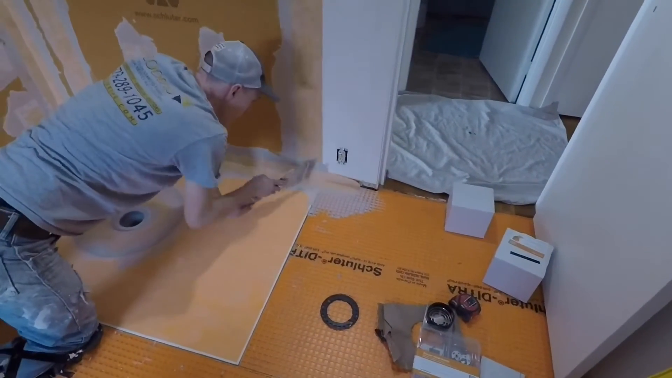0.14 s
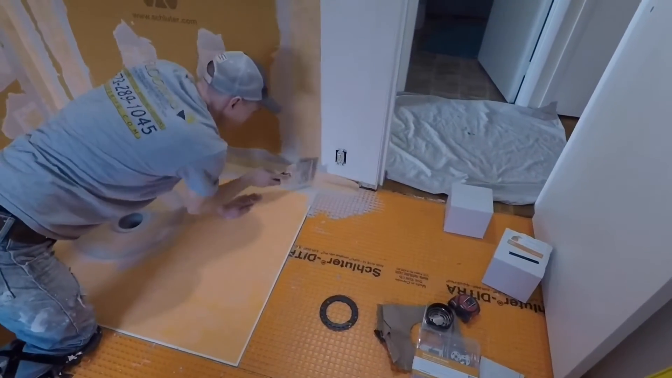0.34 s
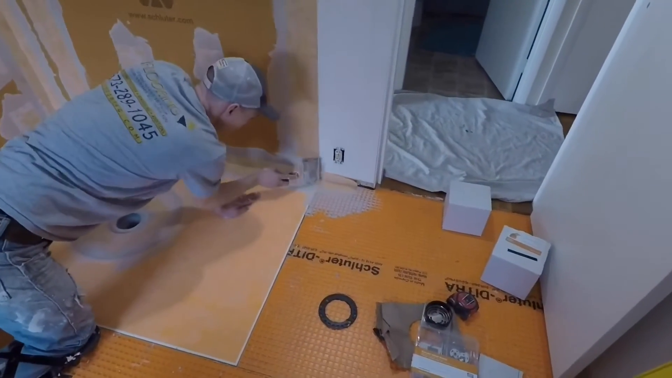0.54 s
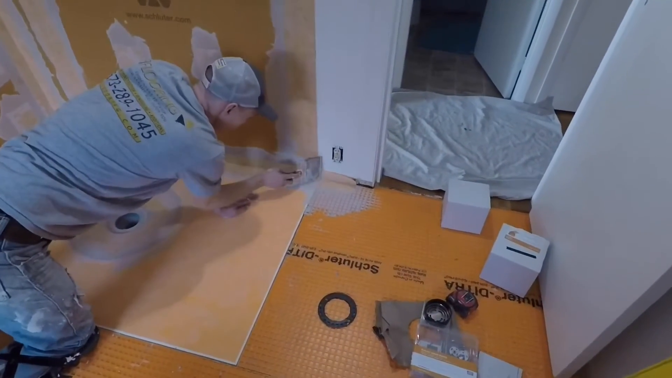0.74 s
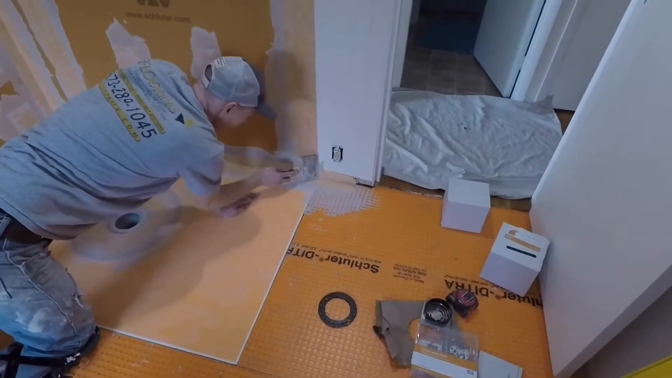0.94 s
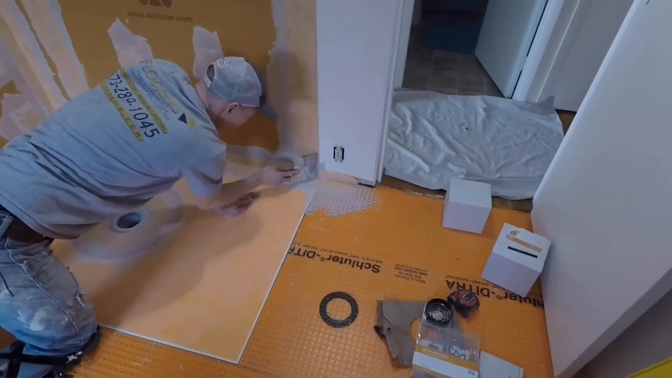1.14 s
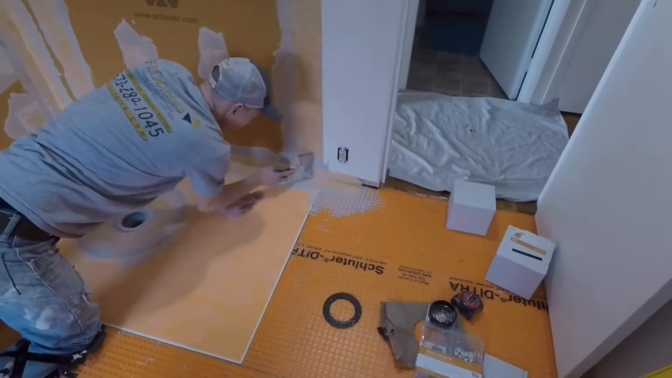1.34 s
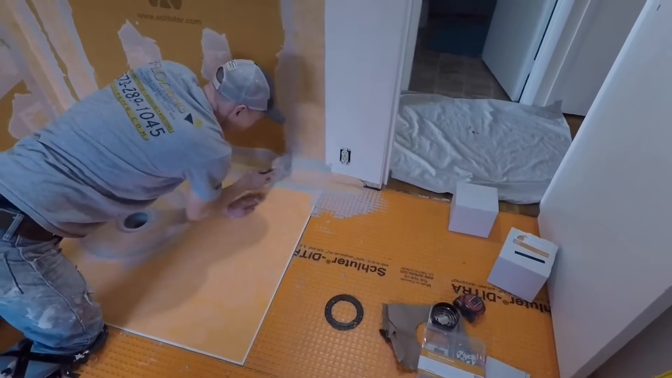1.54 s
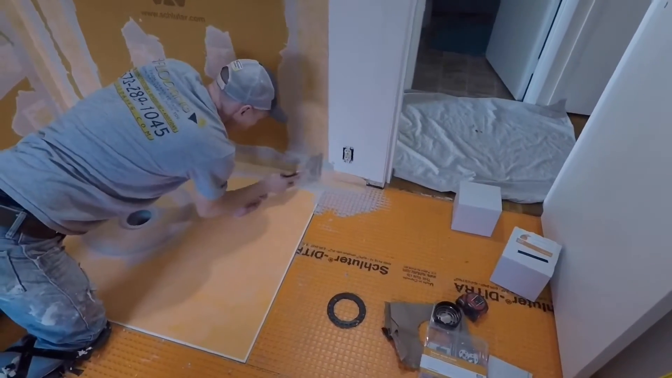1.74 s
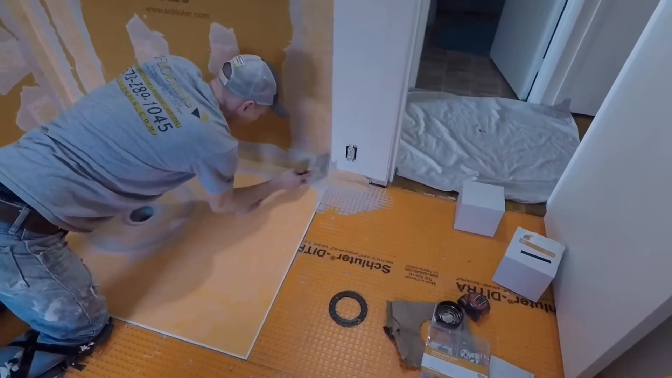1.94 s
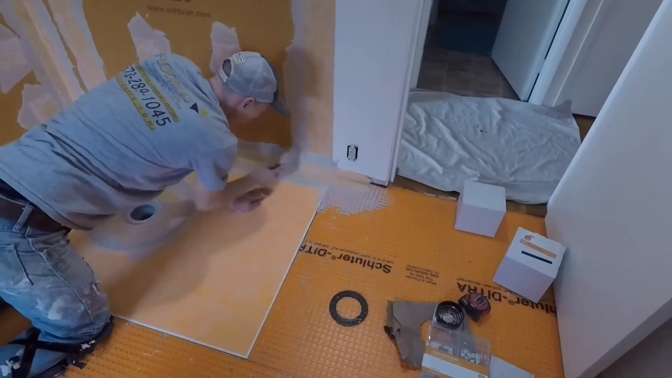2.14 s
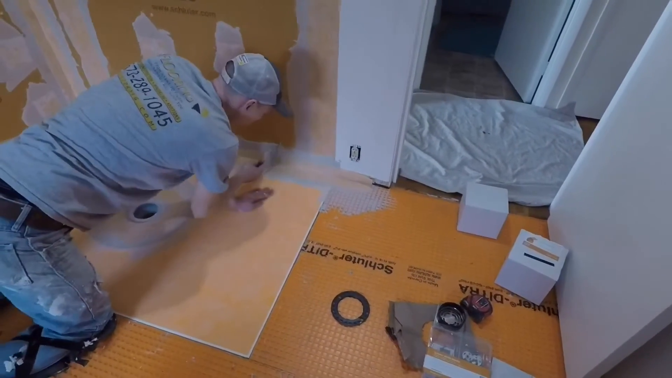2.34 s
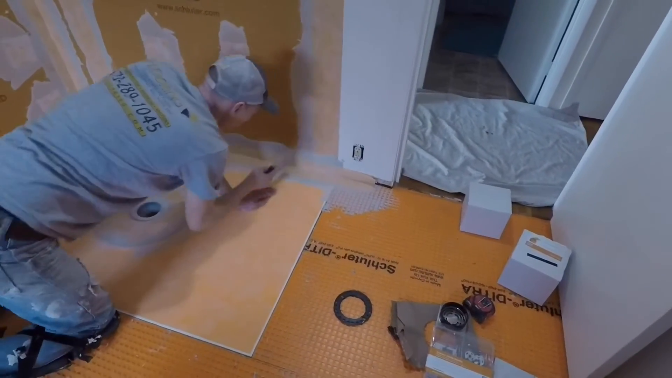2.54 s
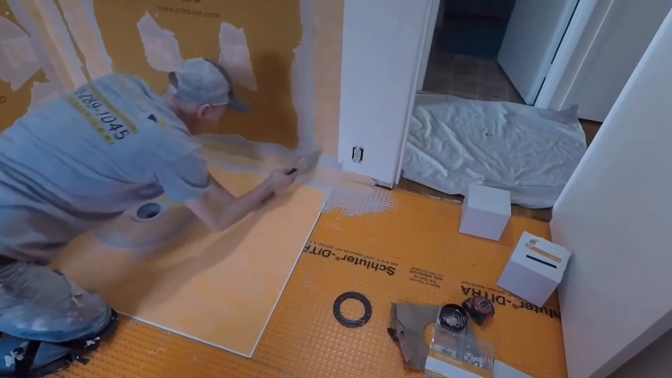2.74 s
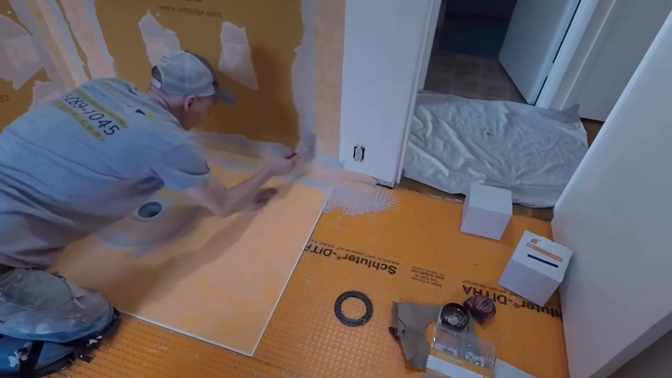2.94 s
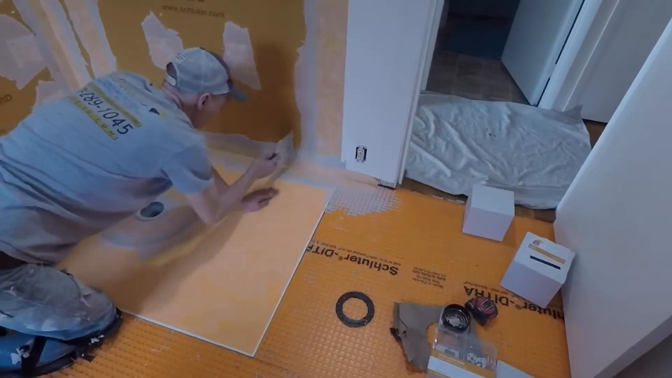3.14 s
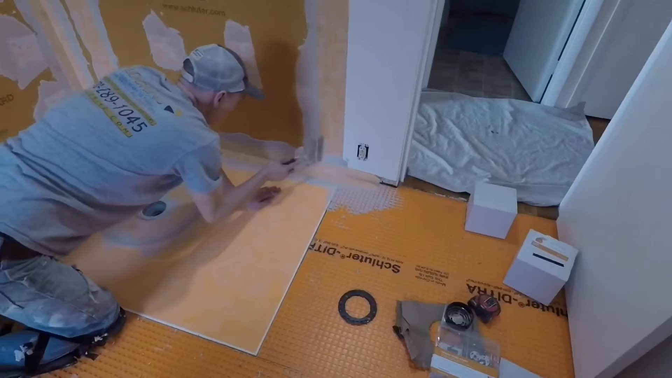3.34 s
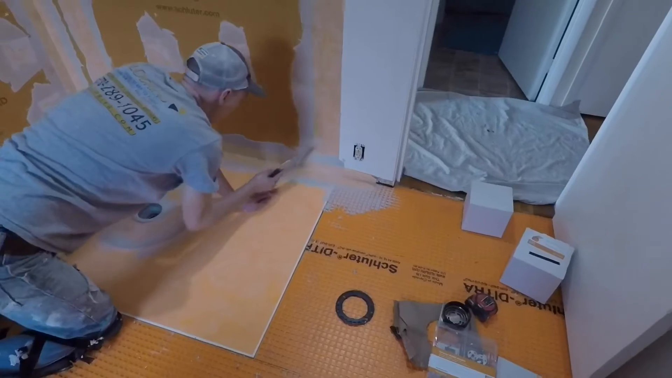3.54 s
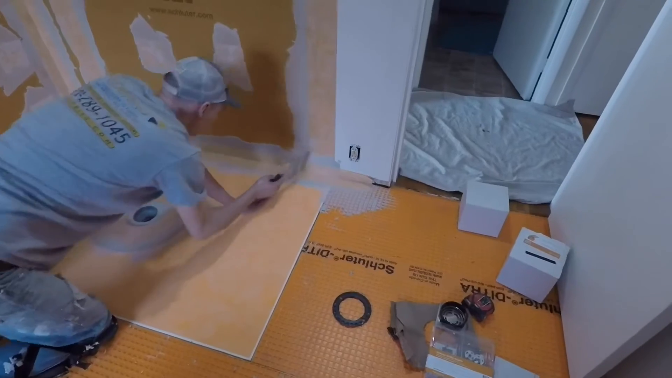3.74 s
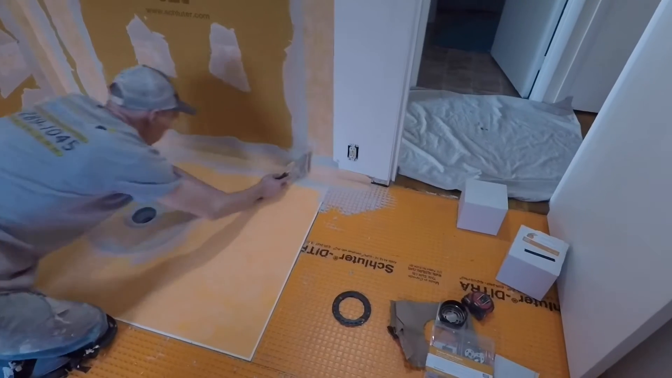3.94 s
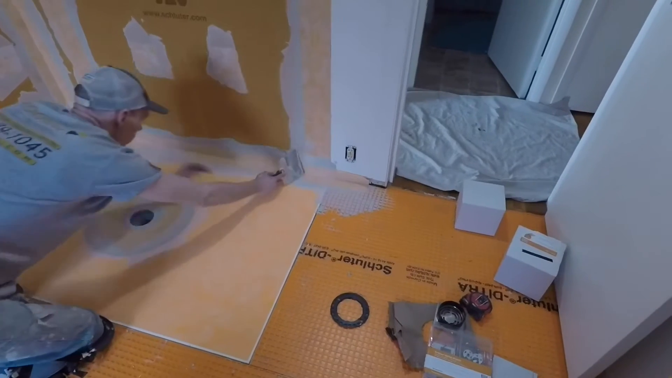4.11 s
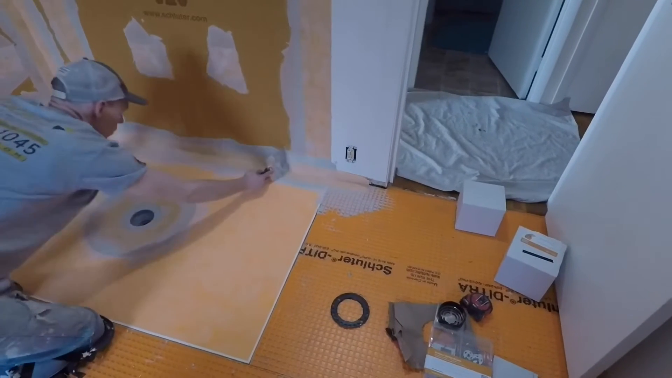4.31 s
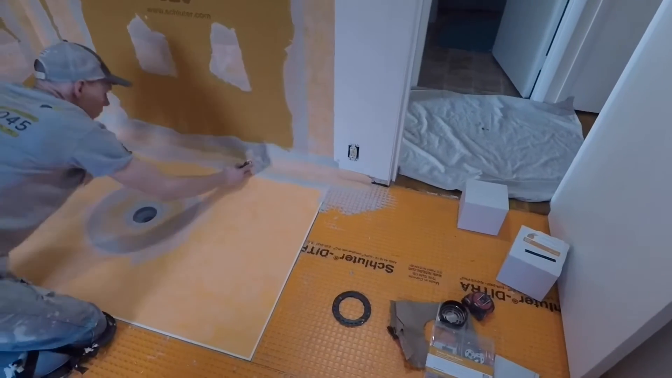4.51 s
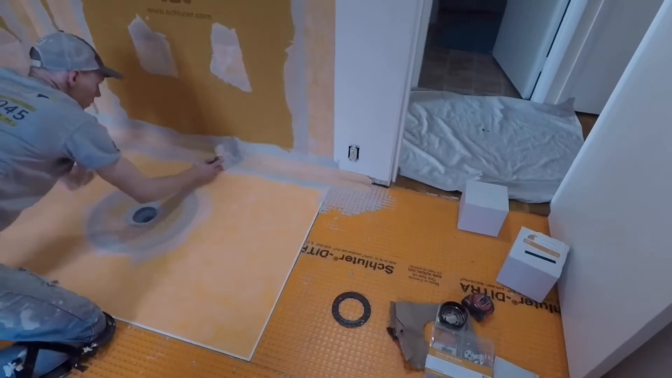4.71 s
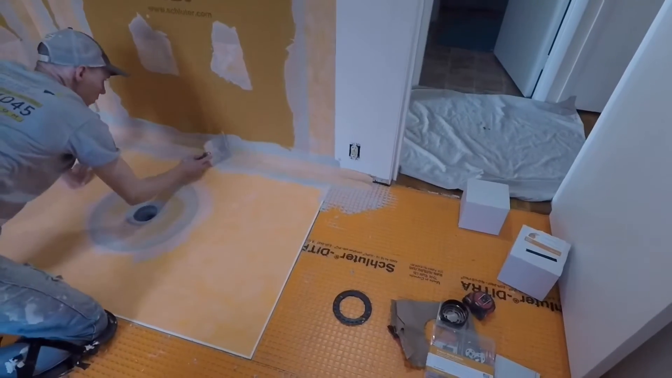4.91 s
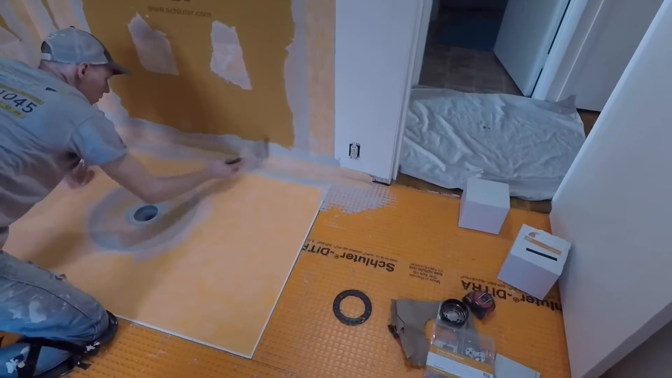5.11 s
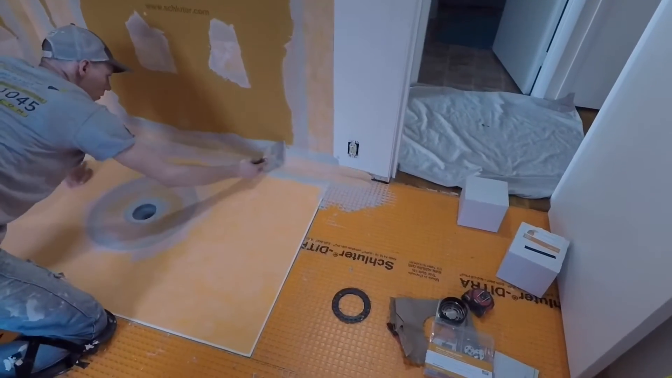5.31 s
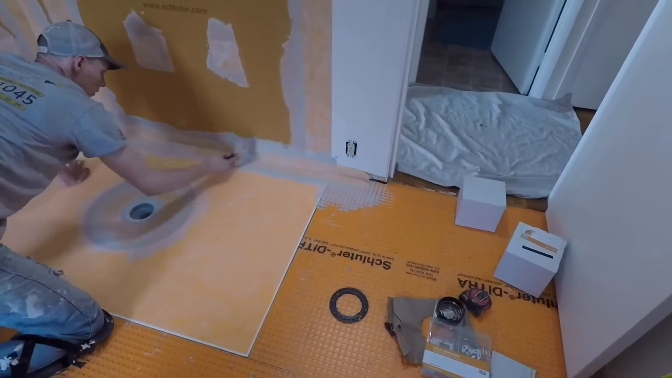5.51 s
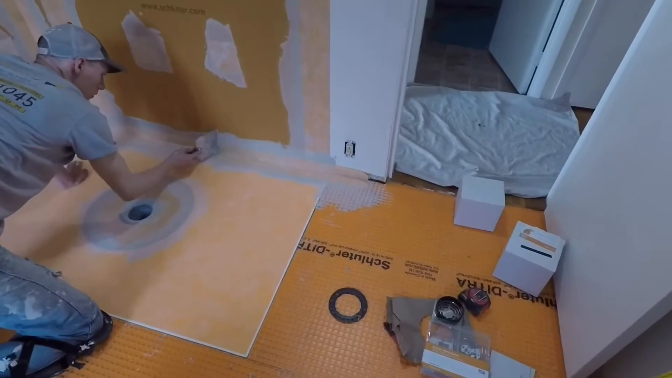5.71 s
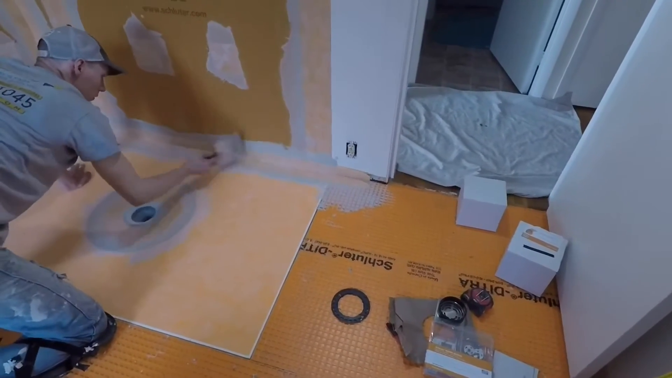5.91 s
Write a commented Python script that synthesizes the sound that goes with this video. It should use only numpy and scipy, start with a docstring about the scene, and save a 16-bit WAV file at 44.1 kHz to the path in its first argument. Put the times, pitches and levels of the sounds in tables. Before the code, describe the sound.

A low ventilation rumble with a thin hiss of air runs throughout in a small bare room. At about 0.5 seconds a steel trowel bumps down with a dull thud and a light tick, then softly brushes the foot of a wall around 1 second. From 1.2 seconds it drags gritty mortar in five strokes, each lasting half a second to a second: a sandy rasp with a thin, high ring from the edge and a hollow rattle from the wall board. The first is the quietest. The others start near 1.9, 2.8, 4.2 and 5.3 seconds, the fourth being the longest. Soft thuds of the tool landing come at 1.9 seconds, in a quick knocking cluster from 4.1 to 4.3, and again at 5.2. Faint grazes fall between strokes. The last scrape fades by 5.9 seconds. The sound is stereo, with brief reverberation and lower tones leaning left.

```python
"""A ventilation rumble fills a small bare room. A steel trowel bumps down with a tick and brushes
the foot of a wall. From 1.2 s it drags gritty mortar along it in five strokes, about one a second:
sand grains rasp under the edge, bend the blade and shake the wall board. The tool bumps down again
before the second, fourth and fifth strokes. Two microphone ports mix it all into stereo."""
import sys
import numpy as np
from scipy import signal
from scipy.fft import rfft, irfft, next_fast_len
from scipy.io import wavfile
from scipy.ndimage import uniform_filter1d, map_coordinates

SR = 44100
rng = np.random.default_rng(int(sys.argv[2]) if len(sys.argv) > 2 else 0)


def dump(signal):
    """Clip the signal to [-1, 1] and save it as 16-bit WAV at the path in sys.argv[1]."""
    limited = np.clip(np.atleast_2d(signal).T, -1, 1)
    pcm = np.round(limited * 32767).astype(np.int16)
    wavfile.write(sys.argv[1], SR, pcm)


N = 262880


def amp(db):
    return 10 ** (np.asarray(db) / 20)


def unit(x):
    return x / np.sqrt(np.mean(x ** 2) + 1e-20)


def along(points, hz):
    """Read the columns after the frequency at hz, on a log axis."""
    f, *cols = np.transpose(points)
    return np.squeeze([np.interp(np.log(hz + 1), np.log(f + 1), c) for c in cols])


def automation(rows):
    """One value per sample for each column after the time."""
    s, *cols = np.transpose(rows)
    return [np.interp(np.arange(N) / SR, s, c) for c in cols]


def filtered(x, response):
    """Pass x through a complex frequency response."""
    m = next_fast_len(N + SR // 2)
    return irfft(rfft(x, m) * response(np.fft.rfftfreq(m, 1 / SR)), m)[..., :N]


def resonances(modes, f):
    """Response at f of (frequency, width, level) modes of alternating polarity."""
    return sum((-1) ** k * amp(db) * 1j * f * width / (hz * hz - f * f + 1j * f * width)
               for k, (hz, width, db) in enumerate(modes))


def wobble(per_s):
    """A smooth random curve, per_s knots a second."""
    return map_coordinates(rng.standard_normal(int(N * per_s / SR) + 4), [np.arange(N) * per_s / SR])


def grit(spread_db, clump_s):
    """Sand grains of log-normal size arriving in clumps; two unrelated streams."""
    clumps = unit(uniform_filter1d(rng.standard_normal((2, N)), max(1, int(clump_s * SR))))
    return unit(rng.standard_normal((2, N)) * amp(spread_db * clumps))


def swept_peak(x, centre_hz, lift_db, width, frame, patchy_db):
    """Sweep an EQ peak over x at steady loudness; width is a fraction of the centre."""
    hz, t, spectrum = signal.stft(x, SR, nperseg=frame)
    centre, lift = (np.interp(t, np.arange(N) / SR, c) for c in (centre_hz, lift_db))
    gain = 1 + (amp(lift) - 1) / (1 + (np.log((hz[:, None] + 1) / centre) / width) ** 2)
    # uneven mortar excites some frequencies more than others from moment to moment
    patches = uniform_filter1d(rng.standard_normal(spectrum.shape[1:]), size=3, axis=0)
    patches = uniform_filter1d(patches, size=6, axis=1)
    spectrum = spectrum * amp(patchy_db * unit(patches))
    power = np.mean(np.abs(spectrum) ** 2, axis=(0, 2))[:, None]
    gain = gain * np.sqrt(power.sum() / (power * gain ** 2).sum(axis=0))
    rms = np.sqrt(2 * power.sum() / 1.5)  # 1.5 is the window's noise bandwidth
    return signal.istft(spectrum * gain, SR, nperseg=frame)[1][:, :N] / rms


# Low room modes (frequency [Hz], width [Hz], level [dB])
ROOM_MODES = [(60.7, 4, 2), (91.5, 14.6, -1.5), (108.8, 44, -6), (144.6, 22.6, -1.5)]
# Tone of the air hiss (frequency [Hz], level [dB])
AIR_EQ = [(170, -1), (200, -4.5), (300, -13.5), (500, -20.5), (1000, -29.5), (2600, -38), (3500, -40.5),
          (5000, -45), (5700, -38.5), (6300, -39), (7000, -42.5), (10400, -44.5), (11500, -50),
          (15000, -63)]
# Fader rides on the bed (time [s], rumble level [dB], deep bass level [dB])
VENT_LEVELS = [(0.05, -22.5, -21.5), (0.34, -23.5, -45), (0.42, -22, -28), (2.13, -25.5, -42),
               (2.51, -26.5, -30), (2.95, -21.5, -30), (3.21, -27.5, -45), (4.12, -23, -28),
               (4.15, -21.5, -32), (5.0, -25.5, -25.5), (5.05, -28, -33), (5.21, -20.5, -27),
               (5.65, -27.5, -46), (5.9, -29, -39)]


def ventilation():
    """Duct noise rings the room's low modes under a thin hiss of air; a deeper bass wavers below."""
    noise = lambda response: unit(filtered(rng.standard_normal((2, N)), response))
    rumble = noise(lambda f: resonances(ROOM_MODES, f) / (1 + (f / 165) ** 8) / (1 + (48 / (f + 1)) ** 4))
    deep = noise(lambda f: resonances([(28, 26, 0)], f) / (1 + (f / 48) ** 4))
    air = noise(lambda f: amp(along([(120, -56)] + AIR_EQ, f)))
    deep = unit(deep * amp(4 * wobble(per_s=6)))
    rumble_db, deep_db = automation(VENT_LEVELS)
    return amp(rumble_db) * rumble + amp(deep_db) * deep + amp(-40.5) * air


# Reverb tail of the bare room (frequency [Hz], time to fall 60 dB [s])
ROOM_DECAY = [(200, 0.14), (1000, 0.63), (6000, 0.44), (12000, 0.16)]


def room(x):
    """Each frequency of the reverberation dies at its own speed."""
    hz, t, spectrum = signal.stft(rng.standard_normal((2, SR * 3 // 4)), SR, nperseg=256)
    decay = amp(-60 * t / along(ROOM_DECAY, hz)[:, None])
    tail = signal.istft(spectrum * decay, SR, nperseg=256)[1]
    predelayed = np.pad(x, ((0, 0), (300, 0)))
    return signal.fftconvolve(predelayed, tail / np.linalg.norm(tail[0]), axes=1)[:, :N]


# Steel touching down (time [s], level [dB])
TICKS = [(0.448, -44.5)]


def blade_tick():
    """The blade lands with a 90 ms burst of hiss and a steel ping."""
    out = np.zeros(N + SR)
    t = np.arange(SR // 10) / SR
    attack = 1 - np.exp(-t / 0.0013)
    ping = 1.5 * np.sin(2 * np.pi * 1200 * t)
    for s, db in TICKS:
        hiss = uniform_filter1d(rng.standard_normal(len(t)), size=3)
        out[round(s * SR):][:len(t)] += amp(db - 60 * t / .09) * attack * (hiss + ping)
    return out[:N]


def struck(response, contact_s):
    """A smooth force pulse rings the struck body; normalised to peak 1."""
    force = np.sin(np.pi * np.clip(np.arange(N) / SR / contact_s, 0, 1)) ** 2
    sound = filtered(force, response)[:SR // 3]
    return sound / np.abs(sound).max()


# Thud of the floor (frequency [Hz], width [Hz], level [dB])
FLOOR_MODES = [(67.6, 18.5, 12.5), (89.8, 7.2, 16.5), (152, 25, 6.5)]
# Soft hits of the tool (time [s], floor thud level [dB], board knock level [dB])
BUMPS = [(0.461, -11, -55), (1.895, -12, -35), (4.062, -11, -11), (4.081, -13.5, -9), (4.125, -33, -14.5),
         (4.25, -10, -2), (5.235, -11, -15.5), (5.257, -33, -28), (5.28, -15.5, -22)]


def bumps():
    """Soft blows push a low thud through the floor and knock the board and blade."""
    def board_and_blade(f):
        board = resonances(BOOM_MODES, f) + 0.42 * resonances(RATTLE_MODES, f)
        return board + 0.23 * resonances(FLEX_MODES, f)

    out = np.zeros(N + SR)
    thud = -struck(lambda f: resonances(FLOOR_MODES, f), contact_s=0.0051)
    knock = -struck(board_and_blade, contact_s=0.0023)
    for s, thud_db, knock_db in BUMPS:
        out[round(s * SR):][:len(thud)] += amp(thud_db) * thud + amp(knock_db) * knock
    return out[:N]


# Light touches; the first row is the fading end of a stroke made just before the start (peak time [s], level
# [dB], 20 dB rise [s], 20 dB fall [s], edge ring lift [dB])
BRUSHES = [(0.01, -59, .02, .25, 10), (.452, -53, .01, .2, 9), (.58, -60, .15, .2, 9),
           (.75, -52, .2, .2, 5), (.885, -50, .04, .15, 6), (.98, -39, .12, .12, 7), (1.1, -50, .2, .3, 7),
           (1.9, -51, .2, .1, 8), (2.57, -52, .2, .25, 16), (3.62, -61, .4, .5, 6),
           (3.95, -44.5, .15, .25, 6), (4.08, -52, .03, .1, 6), (5.24, -50, .02, .2, 10)]


def brushes():
    """Gain and ring lift as the edge grazes the wall: each touch swells and fades evenly in dB."""
    s, peak_db, rise, fall, lift_db = np.transpose(BRUSHES)[..., None]
    since = np.arange(N) / SR - s
    swells = amp(peak_db - 20 * np.maximum(-since / rise, since / fall)) + 1e-9
    gain = swells.sum(0)
    return gain, (swells * lift_db).sum(0) / gain


# Automation, one list per stroke (time [s], rasp [dB], board boom [dB], board rattle [dB],
# blade flex [dB], edge ring [Hz], edge ring lift [dB], flex peak [Hz])
STROKES = [
    [(1.19, -57, -46, -54, -57, 6100, 9, 590), (1.222, -45, -59, -63, -59, 5950, 1, 530),
     (1.31, -36, -29, -41.5, -42, 6200, 6, 538), (1.362, -35, -39, -36, -42.5, 6000, 5, 600),
     (1.396, -33, -36, -41, -33, 6170, 6, 580), (1.444, -32.5, -24, -27.5, -27.5, 6010, 2, 666),
     (1.468, -35, -16.5, -24, -25, 5740, 8, 577), (1.536, -41.5, -23, -38, -35, 5760, 10, 540),
     (1.572, -49, -50, -36, -45, 5890, 7, 540), (1.628, -55, -35, -50, -48, 5870, 6, 564),
     (1.68, -63.5, -48, -48, -54, 5670, 7.4, 540)],
    [(1.94, -55, -45, -50, -59, 5790, 6, 545), (2.018, -35, -33.5, -39, -32.5, 5950, 4, 543),
     (2.062, -32, -41, -36, -28.5, 6080, 4.7, 610), (2.128, -28, -16.5, -26.5, -20.5, 5800, 5.5, 642),
     (2.154, -30.5, -14, -27, -26.5, 5700, 9, 580), (2.19, -23.5, -28, -22, -23, 5700, 12, 570),
     (2.224, -23, -13, -22.5, -22, 5810, 16, 557), (2.25, -25.5, -23, -20, -23, 5770, 15, 528),
     (2.282, -30.5, -21.5, -16.5, -31.5, 5650, 13, 540), (2.354, -41, -35, -28, -41, 5830, 11, 520),
     (2.46, -55.5, -36.5, -43, -51, 5800, 9, 540)],
    [(2.82, -52, -48, -66, -74, 6300, 9, 566), (2.882, -41.5, -25, -37, -39, 5820, 9, 555),
     (2.902, -36.5, -26.5, -35, -30, 5830, 6, 570), (2.976, -25, -15.5, -28.5, -21.5, 5330, 12.5, 670),
     (3.014, -20.5, -18, -26, -22, 5500, 19, 588), (3.046, -30, -13.5, -21.5, -27, 5720, 17, 520),
     (3.128, -35.5, -19.5, -32.5, -31.5, 5600, 15, 530), (3.174, -37.5, -30, -35.5, -36, 5600, 21, 557),
     (3.298, -60, -56, -60, -55, 5520, 16, 553), (3.33, -65, -60, -62, -57, 5770, 9, 538)],
    [(4.16, -54, -42, -50, -52, 5540, 9, 538), (4.198, -38, -23.5, -28, -31.5, 5500, 9, 535),
     (4.246, -30, -20.5, -27, -29, 5610, 14.5, 570), (4.318, -31, -14.5, -18, -31.5, 5740, 17, 490),
     (4.57, -30.5, -22, -23.5, -26.5, 5900, 11.5, 610), (4.598, -26, -27, -27.5, -26.5, 5960, 11, 527),
     (4.71, -29.5, -40, -32, -32.5, 5660, 9.5, 554), (4.796, -31.5, -34, -23, -21, 6020, 5, 552),
     (4.834, -32.5, -22.5, -25, -24, 6450, 4, 560), (4.932, -43.5, -37, -32, -36, 5870, 2, 545),
     (5.05, -63, -53, -54.5, -48, 6000, 9, 600)],
    [(5.31, -54, -41, -37, -45, 5730, 7, 514), (5.342, -39.5, -18, -28.5, -35.5, 5750, 8, 506),
     (5.376, -29.5, -17, -15, -34, 5850, 14, 515), (5.44, -28.5, -18, -21, -28.5, 5970, 19, 540),
     (5.522, -25, -20, -27, -15.5, 5960, 20, 582), (5.558, -22, -35, -32, -29.5, 6000, 10.5, 590),
     (5.622, -25, -38, -29, -21.5, 5770, 8, 606), (5.668, -27.5, -28.5, -27, -17.5, 5460, 9, 560),
     (5.716, -30.5, -29.5, -29, -20.5, 6250, 5.2, 635), (5.902, -55.5, -73, -52, -48, 5950, 4, 650),
     (5.94, -60, -57, -69, -56, 5950, 8.5, 643)],
]


def strokes():
    """The trowel's drags: a soft contact gate (0-1), then the automation curves."""
    t = np.arange(N) / SR
    gate = sum((t > rows[0][0]) & (t < rows[-1][0]) for rows in STROKES)
    contact = uniform_filter1d(gate.astype(float), size=600)
    return contact, *automation(np.concatenate(STROKES))


# Low board, upper board and bending blade modes (frequency [Hz], width [Hz], level [dB])
BOOM_MODES = [(197, 1.85, -2), (231.4, 9.4, -0.5), (277.8, 12.7, -4)]
RATTLE_MODES = [(312, 39, -5), (372, 7.9, 0), (395, 9.5, -0.5), (447.5, 29.6, 0.5)]
FLEX_MODES = [(511, 49, 5), (580, 51, 2.5), (638, 76, 0), (726, 33, -1), (787, 16, 3), (879, 26, -1),
              (889, 12, -7)]


def board_and_blade_shake():
    """While the blade presses, coarse grains bend it and shake the board behind the mortar."""
    contact, _, boom_db, rattle_db, flex_db, _, _, flex_hz = strokes()
    brush, _ = brushes()
    coarse = grit(spread_db=2, clump_s=0.0082)
    highpass = lambda f, hz: 1 / (1 + (hz / (f + 1)) ** 6)
    band = lambda f, low_hz, high_hz: highpass(f, low_hz) * (1 - highpass(f, high_hz))
    flex = filtered(coarse, lambda f: resonances(FLEX_MODES, f) * highpass(f, hz=447))
    flex = swept_peak(flex, flex_hz, lift_db=np.full(N, 12.), width=0.025, frame=2048, patchy_db=1.5)
    rattle = unit(filtered(coarse, lambda f: resonances(RATTLE_MODES, f) * band(f, 274, 490)))
    boom = unit(filtered(coarse, lambda f: resonances(BOOM_MODES, f) * band(f, 164, 323)))
    brushed = amp(-3.5) * (boom + rattle) + amp(-9.5) * flex
    pressed = amp(boom_db) * boom + amp(rattle_db) * rattle + amp(flex_db) * flex
    return brush * brushed + contact * pressed


# Grit layers: mid scrape, bright rasp, top sizzle (frequency [Hz], level [dB])
SCRAPE_EQ = [(700, -0.5), (1000, 1.5), (1500, 0), (2100, -5), (3200, -12), (4200, -53)]
RASP_EQ = [(2500, -9), (3300, -8), (4500, -5.5), (5800, -7), (7000, -3), (8200, -28.5)]
SIZZLE_EQ = [(6500, -26), (7600, -1), (8500, -5.5), (10400, -7), (11400, -23), (15000, -28)]
# Upper blade modes that colour the scrape (frequency [Hz], width [Hz], level [dB])
BLADE_MODES = [(1110, 33, -9), (1295, 6.7, -8), (1650, 18, -13), (1910, 6.7, -50), (2720, 30, -8)]


def edge_rasp():
    """Fine grains rasp under the steel edge, whose ringing moves with its angle to the wall."""
    contact, rasp_db, _, _, flex_db, ring_hz, lift_db, _ = strokes()
    brush, brush_lift_db = brushes()
    stroke = contact * amp(rasp_db)
    # the sizzle thins as the edge rings; the scrape partly follows the blade's flex
    sizzle_gain = stroke * amp(-4.5 - 0.54 * lift_db) + brush * amp(-8)
    scrape_gain = stroke * amp(-0.5 + 0.41 * (flex_db - rasp_db)) + brush * amp(-4)
    # the ring crossfades between its stroke and brush settings
    share = stroke / (stroke + brush)
    ring_hz = share * ring_hz + (1 - share) * 6050
    lift_db = share * lift_db + (1 - share) * brush_lift_db
    fine = grit(spread_db=1, clump_s=0.0032)
    rasp = filtered(fine, lambda f: amp(along(RASP_EQ, f)))
    rasp = swept_peak(rasp, ring_hz, lift_db, width=.065, frame=512, patchy_db=2)
    sizzle = unit(filtered(fine, lambda f: amp(along(SIZZLE_EQ, f))))
    medium = grit(spread_db=0.5, clump_s=0.0045)
    scrape = unit(filtered(medium, lambda f: amp(along(SCRAPE_EQ, f)) * (1 + resonances(BLADE_MODES, f))))
    return (stroke + brush) * rasp + sizzle_gain * sizzle + scrape_gain * scrape


def scene():
    """Trowel, reverb and bed in two channels: what both ports hear alike, and what differs."""
    trowel = edge_rasp() + board_and_blade_shake() + bumps() + blade_tick()
    return amp(0.5) * trowel + amp(-10.5) * room(trowel) + ventilation()


# Stereo image (frequency [Hz], likeness [0-1], left phase lead [rad], left minus right [dB])
STEREO_PORTS = [(60, .99, 0, -2.7), (130, .99, 0, -3.6), (200, .99, .3, -6), (270, .98, .5, -7),
                (350, .94, 1.1, -9.6), (430, .8, 2.3, -12), (520, .78, 3.7, -10), (700, .72, 4.6, -4.5),
                (1000, .48, 5.6, -2.3), (1400, .35, 6.3, -2.5), (2200, .4, 6.4, .3), (3000, .62, 6.2, 0),
                (4000, .85, 6.3, .3), (5500, .15, 6.8, 2.2), (8000, .05, 9, 0), (10000, .15, 9.8, -3.3),
                (12500, .05, 9.5, -.4)]


def record(dry):
    """The two ports differ in phase and level by frequency; soft clipping, then a high cut."""
    side = np.array([[1], [-1]])

    def ports(hz, shared):
        likeness, lead, lean_db = along(STEREO_PORTS, hz)
        spread = np.arccos(np.clip(likeness, 0, 1)) / 2
        tilt = amp(side * lean_db / 2) * np.exp(1j * side * lead / 2)
        return tilt * (np.cos(spread) if shared else side * np.sin(spread))

    pair = filtered(dry[0], lambda f: ports(f, shared=True))
    pair += filtered(dry[1], lambda f: ports(f, shared=False))
    clipped = pair / (1 + np.abs(pair / .98) ** 6) ** (1 / 6)
    return filtered(clipped, lambda hz: hz < 15050)


dry = scene()
out = record(dry)
dump(out)
```